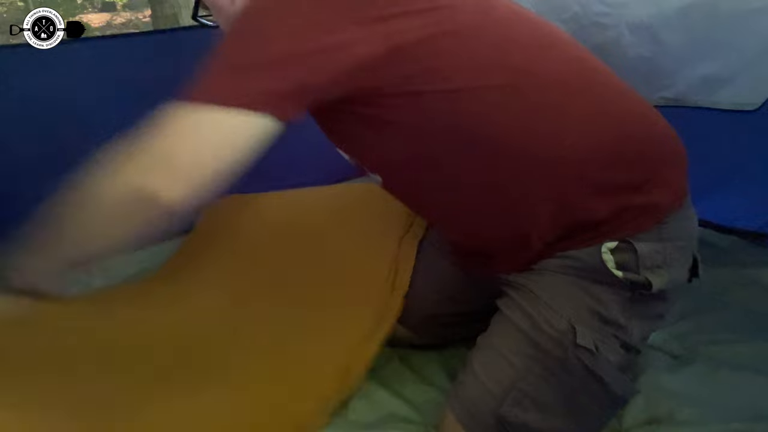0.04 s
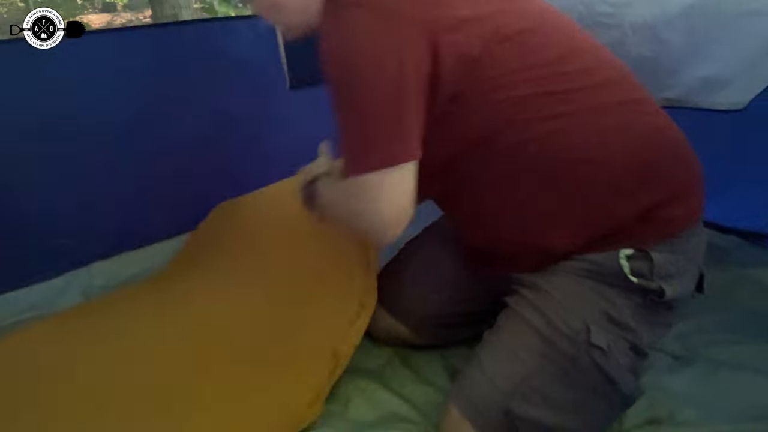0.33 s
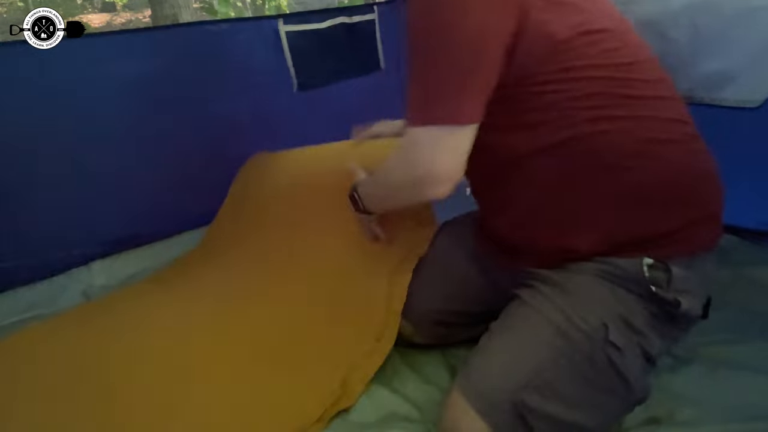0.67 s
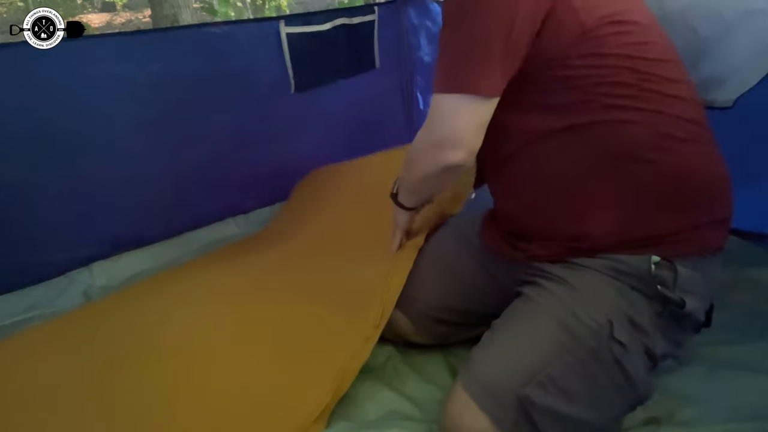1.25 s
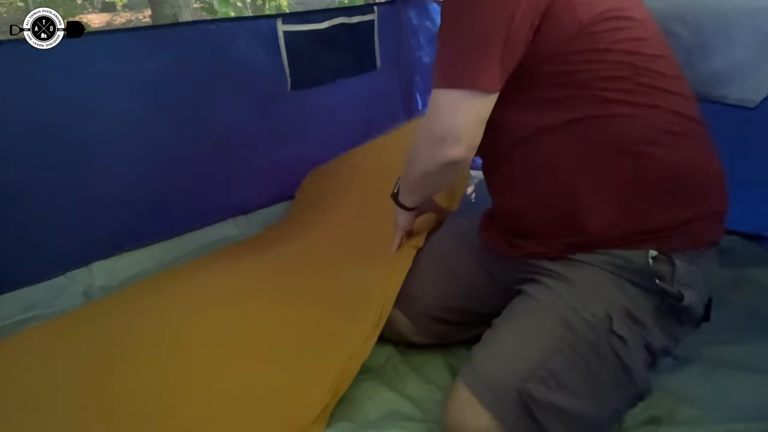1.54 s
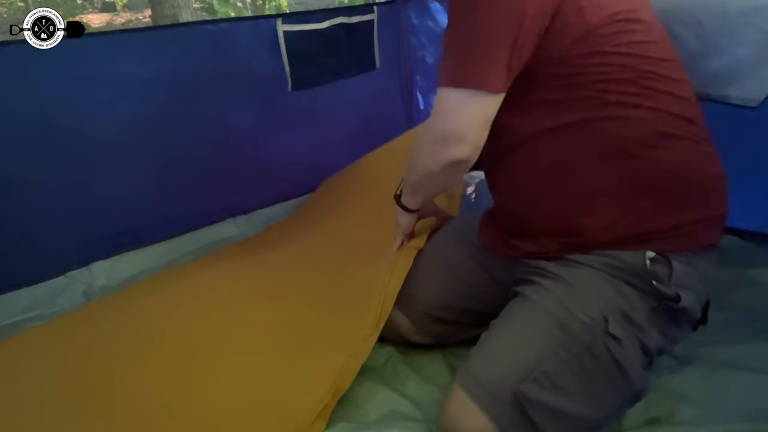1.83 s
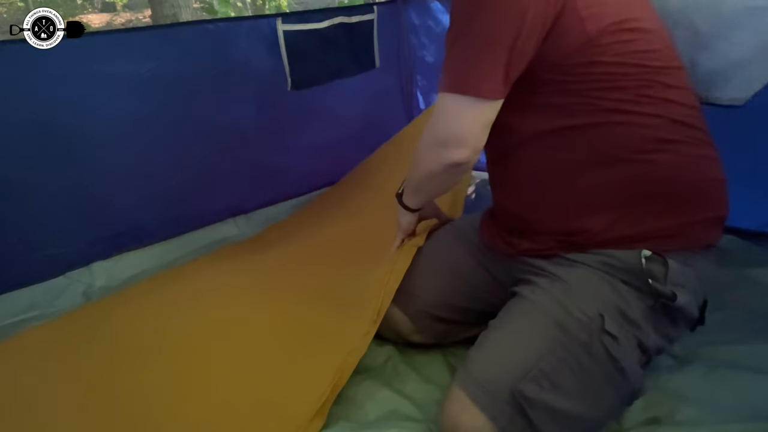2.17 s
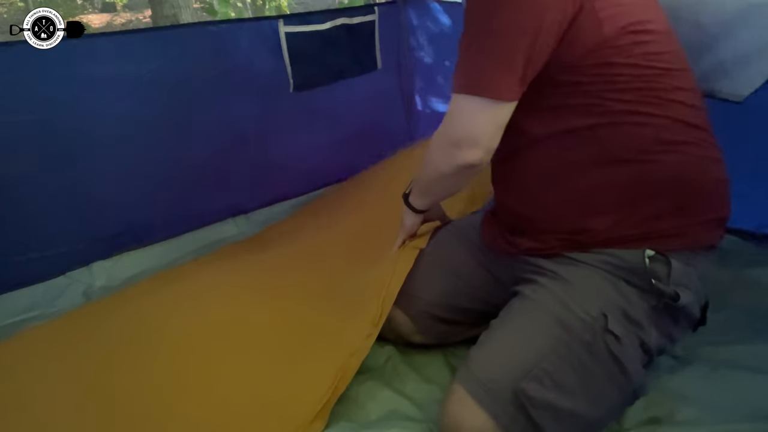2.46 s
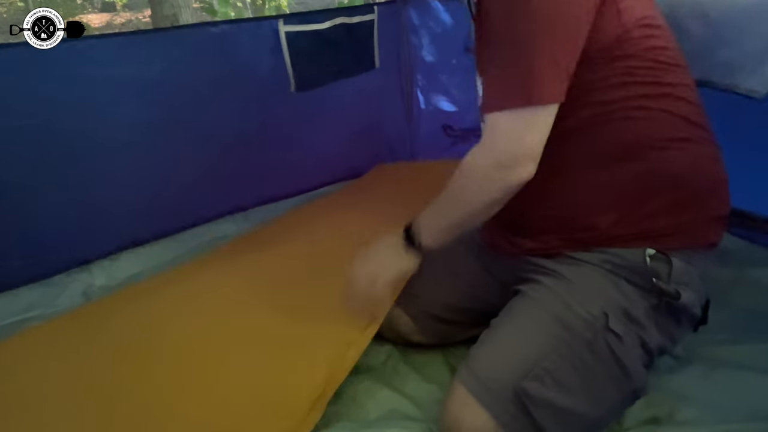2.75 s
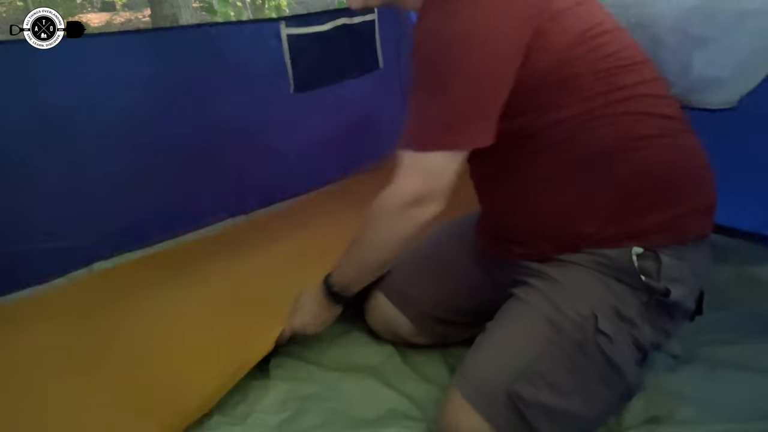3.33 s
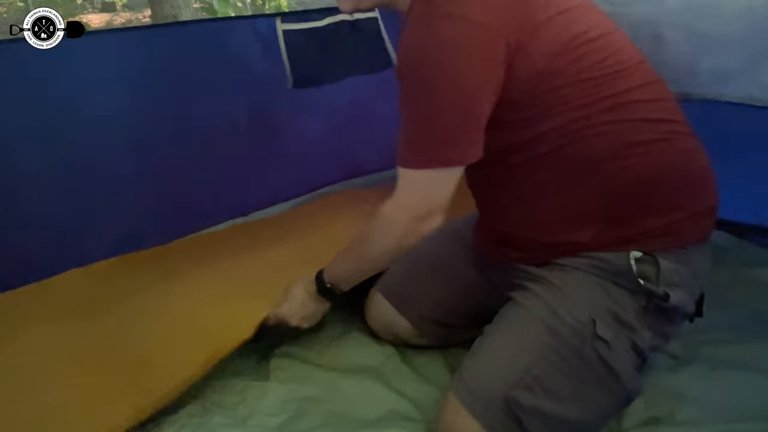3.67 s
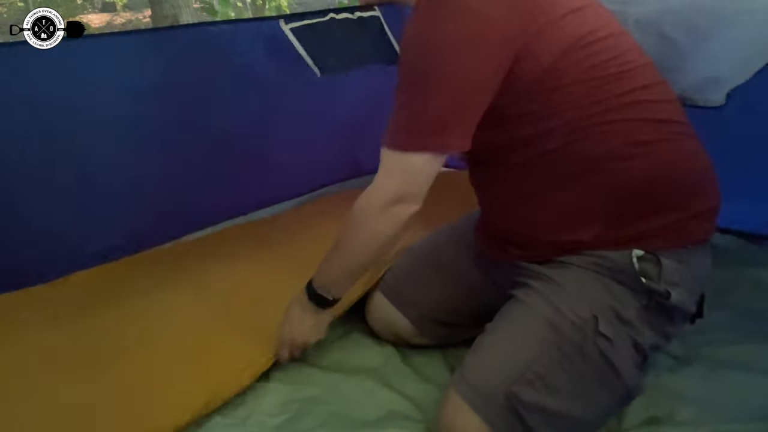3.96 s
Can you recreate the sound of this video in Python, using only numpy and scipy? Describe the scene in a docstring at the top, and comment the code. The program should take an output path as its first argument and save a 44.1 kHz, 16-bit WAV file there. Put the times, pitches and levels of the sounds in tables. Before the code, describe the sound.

Nylon rubbing and crinkling as an inflated camping mattress is shifted by hand, with soft thuds.

```python
"""Inside a tent, someone kneeling shifts an inflated camping mattress and slides a hand along its edge.
Nylon rubs in strokes of tiny slips, crumples in bursts of creases and zips as its ribbed weave slides.
The taut skin pops as it buckles and judders under the hand; the air-filled body thuds on the ground sheet.
The thin walls return a little of it all, over a quiet outdoor bed."""
import sys
import numpy as np
from scipy import signal
from scipy.fft import rfft, irfft
from scipy.io import wavfile

SR = 44100
rng = np.random.default_rng(int(sys.argv[2]) if len(sys.argv) > 2 else 0)


def wav_record(signal):
    """Record a signal, one row per channel, as 16-bit PCM in the file named by sys.argv[1]."""
    frames = np.transpose(np.atleast_2d(signal))
    bounded = np.clip(frames, -1, 1)
    # unit amplitude maps onto the largest positive 16-bit level
    quanta = np.round(bounded * 32767).astype(np.int16)
    wavfile.write(sys.argv[1], SR, quanta)


N = 176400
T = np.arange(N) / SR

# tone of the outdoor bed, in the centre and at the sides (frequency [Hz], relative level [dB])
OUTDOOR_EQ = [(15, -20), (28, 2.5), (60, 2), (130, 3), (200, -3.5), (670, -6.5), (1200, -10), (2070, -15.5),
              (4040, -18.5), (6370, -25), (9000, -23.5), (15000, -27)]
OUTDOOR_SIDE_EQ = [(20, -5), (70, 5.5), (150, -1), (400, -0.5), (2000, -43), (15000, -38)]
# stereo width from scattered sound (frequency [Hz], side relative to mid [dB])
WIDTH_EQ = [(30, -12), (70, -19), (140, -15), (300, -37), (1000, -51), (4000, -38.5), (8000, -32),
            (15000, -67)]
# the mattress bumps the ground sheet (start [s], level [dB], decay [s])
THUDS = [(0.023, -37.5, 0.061), (.09, -35.5, 0.066), (0.359, -45, 0.033), (.478, -42, 0.023),
         (0.514, -47.5, 0.074), (0.619, -52, 0.17), (0.849, -57, 0.034), (0.956, -48, 0.034),
         (2.759, -54, 0.11), (3.082, -53, .15), (3.482, -52, 0.084)]
# tone of a thud (frequency [Hz], relative level [dB])
THUD_EQ = [(20, -5), (45, -7), (80, -4), (140, -2), (200, -10), (400, -48), (1500, -72)]
# stretches where the hand judders (middle [s], half length [s], level [dB])
JUDDER_SPANS = [(3.175, 0.12, -46), (3.9, 0.14, -51.5)]
# the weave zips against itself (start [s], length [s], start pitch [Hz], end pitch [Hz], level [dB])
ZIPS = [(0.923, 0.031, 2000, 2680, -54.5), (.945, .055, 4000, 3290, -58), (1.874, 0.059, 3600, 9240, -57.5),
        (1.894, 0.022, 4450, 3700, -53.5), (1.909, 0.032, 6200, 3170, -55), (1.911, 0.02, 3300, 2100, -58),
        (1.927, 0.062, 3800, 3950, -65), (3.013, 0.042, 4700, 5700, -55), (3.037, 0.054, 4000, 2590, -49.5),
        (3.054, .055, 5800, 4370, -49.5), (3.112, .06, 5500, 4400, -48)]
# the taut skin buckles (start [s], level [dB], pitch [Hz], decay [s])
BUCKLES = [(.8572, -22.5, 730, 0.0031), (0.8574, -18, 346, 0.0051), (0.864, -24.5, 240, 0.0066),
           (.901, -33, 300, 0.0032), (2.8014, -25, 660, 0.00072), (2.845, -30.5, 494, 0.00096),
           (2.872, -35.5, 400, 0.0014), (3.3991, -28, 200, 0.004)]
# crumples and lone creases (start [s], rise [s], hold [s], decay [s], level [dB], bass [dB], treble [dB])
CREASE_BURSTS = [(0.086, .0004, 0.00066, 0.0077, -27, -3, 11), (0.09, 0.011, 0.024, 0.014, -27, 1.5, 7),
                 (0.169, 0.0059, .002, 0.0049, -38, 2, 4), (0.279, 0.003, 0.0049, 0.0079, -40, -3, -5),
                 (.307, 0.0008, 0.01, 0.004, -40.5, -9, 3), (.3402, 0.00043, 0.0016, 0.0013, -42, 0, 11),
                 (.3635, 0.0012, 0.005, 0.0037, -44.5, 13, -10), (.588, .002, .002, 0.0028, -53, -8, 6),
                 (0.67, 0.0041, .003, 0.0056, -46.5, 31, -12), (.729, 0.0026, 0.0053, 0.0019, -38, -11, 11),
                 (0.8348, .001, 0.0037, 0.017, -40, 21, 3), (0.849, .002, .003, 0.0023, -43, -1, 2),
                 (.857, 0.00034, 0.0055, 0.011, -33.5, 12.5, 1.5),
                 (0.899, 0.0028, 0.0082, 0.0028, -43, 21, -19), (1.055, 0.0023, 0.0024, .004, -50, -9, -20),
                 (1.204, 0.0013, 0.0018, .004, -47, 0, 20), (1.425, .001, 0.0027, .004, -47.5, 9, -24),
                 (1.67, 0.0018, 0.0061, 0.003, -49.5, 4, -4), (1.678, 0.009, 0.007, 0.011, -40, 3.5, 5),
                 (2.088, 0.0016, 0.0024, 0.0035, -49.5, 10, -34),
                 (2.099, .002, 0.0019, .003, -46.5, 13, -18), (2.133, 0.00073, 0.0014, 0.0033, -45, -2, 12),
                 (2.173, 0.0028, 0.0018, 0.0025, -46.5, -5, -8),
                 (2.333, .002, 0.0016, 0.0036, -48, -11, -22), (2.437, 0.0029, 0.0022, 0.0065, -50, 0, 5),
                 (2.4875, 0.00059, .001, .002, -45, -24, -15),
                 (2.602, 0.0034, 0.0048, 0.0036, -46.5, 17, -8),
                 (2.762, 0.0032, 0.0012, 0.0035, -46, -11, -3),
                 (2.774, 0.0008, 0.00092, .003, -46.5, -16, 0),
                 (2.801, 0.0012, 0.0011, 0.0018, -39, -3, -20), (3.196, .004, .01, .006, -49, -10, 16),
                 (3.316, 0.0016, .002, 0.0052, -38, -11, 22), (3.326, 0.0041, 0.019, .008, -44.5, -4, 5),
                 (3.399, 0.0013, 0.014, 0.012, -34, -3, 4), (3.632, 0.0011, .003, .003, -48, -15, 3),
                 (3.91, .003, .003, .005, -41.5, 12, 6), (3.934, 0.0068, 0.0057, 0.005, -31.5, -3, -4)]
# tone of a snapping crease (frequency [Hz], relative level [dB])
CREASE_EQ = [(35, -33), (70, -16), (250, -3), (450, 3), (750, 1), (1450, -4.5), (2200, -4.5), (3600, -7.5),
             (5000, -10.5), (6200, -17), (8500, -18), (11000, -22), (15000, -31)]
# rubbing strokes (peak time [s], rise [s], fall [s], skin drumming [dB], rasp [dB], hiss [dB])
RUB_STROKES = [(.025, .1, 0.077, -42.5, -44, -63), (.16, 0.12, 0.19, -51.5, -49, -55.5),
               (0.559, 0.18, 0.098, -59.5, -54, -55.5), (.64, 0.072, 0.14, -61, -58, -56),
               (.752, 0.019, 0.035, -52.5, -58, -50.5), (.88, 0.032, 0.088, -50, -52.5, -55),
               (0.964, 0.017, 0.066, -52, -57.5, -63), (1.12, 0.08, 0.087, -81, -67.5, -62.5),
               (1.21, 0.057, 0.12, -56.5, -58.5, -60.5), (1.53, 0.12, 0.059, -65.5, -67.5, -62.5),
               (1.745, .04, .03, -58, -58, -60.5), (1.925, 0.09, 0.077, -70, -69, -60),
               (2.2, 0.067, 0.024, -63, -63.5, -63), (2.46, 0.12, 0.13, -61, -65.5, -68.5),
               (2.56, 0.039, 0.033, -60, -62, -54), (2.635, 0.054, 0.059, -53.5, -59.5, -61),
               (2.775, 0.032, 0.027, -63, -72, -60.5), (2.961, 0.054, 0.13, -57, -56.5, -59),
               (3.13, 0.13, 0.3, -48, -46, -50), (3.22, 0.086, 0.11, -49.5, -47.5, -43.5),
               (3.34, 0.05, 0.085, -45.5, -46, -44.5), (3.448, 0.095, 0.046, -49, -49.5, -67),
               (3.539, 0.085, 0.07, -60, -59.5, -65), (3.66, 0.063, 0.09, -54, -50, -58.5),
               (3.78, 0.09, 0.055, -58.5, -48.5, -52), (3.85, 0.089, 0.14, -53, -51, -57),
               (3.99, .07, .08, -49, -49, -56.5)]
# tone of the three layers of a stroke (frequency [Hz], relative level [dB])
SKIN_EQ = [(60, -13), (130, -6.5), (200, -2), (380, -1), (650, -1.5), (900, -4.5), (1500, -8),
           (2500, -19.5), (6000, -50)]
RASP_EQ = [(300, -32), (1200, -2), (2000, -1), (3000, 0), (4000, -1), (5000, -2.5), (6000, -10),
           (9000, -12), (15000, -27)]
HISS_EQ = [(1500, -24), (4500, -4), (6500, -4), (8500, -1), (11000, -1), (13000, -2), (15500, -7.5)]

BASS_SHELF_HZ, TREBLE_SHELF_HZ = 520, 3500
OUTDOOR_DB, OUTDOOR_SIDE_DB = -56, -79
ECHO_S, ECHO_DB, TAIL_DECAY_S, TAIL_DB = .0115, -21, .026, -19
JUDDER_PER_S, JUDDER_SCATTER, SKIN_HZ, SKIN_RING_S = 48, .25, 366, .0035
ZIP_JITTER, ZIP_FLUTTER_DB, ZIP_WOBBLES_PER_S = .09, 4, 2500
GRIP_DB, TICK_VS_RASP_DB = 1.5, -11.5


def undb(db):
    return 10 ** (np.asarray(db) / 20)


def unit_rms(x):
    return x / np.sqrt(np.mean(x ** 2))


def convolve(x, impulse):
    return signal.fftconvolve(x, impulse)[:len(x)]


def eq(x, curve, bass_db=0, treble_db=0):
    """Colour x with an EQ curve and two shelves, as one minimum-phase filter of unit energy."""
    size = 4096
    f = np.maximum(np.fft.rfftfreq(size, 1 / SR), 1)
    hz, db = np.array(curve, float).T
    shelves_db = bass_db / (1 + (f / BASS_SHELF_HZ) ** 2) + treble_db / (1 + (TREBLE_SHELF_HZ / f) ** 2)
    gain = undb(np.interp(np.log(f), np.log(hz), db) + shelves_db)
    cepstrum = irfft(np.log(gain))
    cepstrum[1:size // 2] *= 2
    cepstrum[size // 2 + 1:] = 0
    impulse = irfft(np.exp(rfft(cepstrum)))
    return convolve(x, impulse / np.linalg.norm(impulse))


def clicks(per_s, spread_db, samples=N):
    """Random tiny clicks, many weak and a few strong; rms 1."""
    chance, strength, sign = rng.random((samples, 3)).T
    size = undb(-spread_db * np.log(np.maximum(strength, .01)))
    return unit_rms((chance < per_s / SR) * size * np.sign(sign - .5))


def drift(per_s):
    """Smooth random modulation; rms 1."""
    return unit_rms(np.interp(T * per_s, np.arange(N), rng.standard_normal(N)))


def add(out, start, x):
    """Mix x in at a start time in seconds."""
    i = int(start * SR)
    out[i:i + len(x)] += x[:max(N - i, 0)]


def outdoors():
    """A quiet bed of rumble and air, its level barely wavering."""
    return undb(OUTDOOR_DB + .6 * drift(per_s=7.28)) * eq(rng.standard_normal(N), OUTDOOR_EQ)


def tent(x):
    """The thin walls add one echo and a very short diffuse tail."""
    t = T[:SR // 6]
    tail = rng.standard_normal(len(t)) * np.exp(-t / TAIL_DECAY_S) * (t > ECHO_S / 2)
    reflections = undb(TAIL_DB) * tail / np.linalg.norm(tail)
    reflections[int(ECHO_S * SR)] += undb(ECHO_DB)
    return x + convolve(x, reflections)


def stereo_side(mattress):
    """Only a little scattered sound and outdoor rumble differ between the ears."""
    hz, db = np.array(WIDTH_EQ, float).T
    width = undb(np.interp(np.log(np.fft.rfftfreq(N, 1 / SR) + 1), np.log(hz), db))
    scattered = irfft(1j * width * rfft(mattress), N)  # a quarter cycle out of phase
    return scattered + undb(OUTDOOR_SIDE_DB) * eq(rng.standard_normal(N), OUTDOOR_SIDE_EQ)


def body_thuds(rise_s=.0037):
    """The air-filled body lands on the ground sheet with soft, low thuds."""
    out, t = np.zeros(N), T[:SR // 2]
    for start, db, decay in THUDS:
        envelope = np.minimum(t / rise_s, 1) * np.exp(-np.maximum(t - 2 * rise_s, 0) / decay)
        thud = eq(envelope * rng.standard_normal(len(t)), THUD_EQ)
        add(out, start, undb(db) * thud * np.linalg.norm(envelope) / np.linalg.norm(thud))
    return out


def hand_judder(jerks=260):
    """The dragging hand sticks and slips; each uneven jerk rings the taut skin."""
    out, t = np.zeros(N), T[:SR // 16]
    gap, strength = rng.standard_normal((jerks, 2)).T
    starts = np.cumsum(np.exp(JUDDER_SCATTER * gap)) / JUDDER_PER_S
    skin_ring = np.sin(2 * np.pi * SKIN_HZ * t) * np.exp(-t / SKIN_RING_S)
    for start, db in zip(starts, 2 * strength):
        add(out, start, undb(db) * skin_ring)
    envelope = sum(undb(db) * np.exp(-((T - middle) / half) ** 4) for middle, half, db in JUDDER_SPANS)
    return unit_rms(out) * envelope


def weave_zips():
    """Ribbed weave slides over itself in short scratchy whistles, pitch gliding with the speed."""
    out = np.zeros(N)
    for start, length, from_hz, to_hz, db in ZIPS:
        t = T[:int(length * SR)]
        knots = rng.standard_normal((2, N // 100))
        jitter, flutter = (np.interp(t * ZIP_WOBBLES_PER_S, np.arange(len(k)), k) for k in knots)
        hz = (from_hz + (to_hz - from_hz) * t / length) * (1 + ZIP_JITTER * jitter)
        tone = unit_rms(np.sin(2 * np.pi * np.cumsum(hz) / SR) * undb(ZIP_FLUTTER_DB * flutter))
        add(out, start, undb(db) * np.sin(np.pi * t / length) * tone)
    return out


def skin_pops(cutoff_hz=2220):
    """The skin buckles and swings for a few heavily damped cycles; soft fabric dulls the attack."""
    out, t = np.zeros(N), T[:SR // 8]
    for start, db, hz, decay in BUCKLES:
        add(out, start, -undb(db) * np.sin(2 * np.pi * hz * t) * np.exp(-t / decay))
    return signal.lfilter(*signal.butter(2, cutoff_hz, fs=SR), out)


def nylon_crumples():
    """Creases snap in dense bursts that rise, hold and die quickly."""
    out, t = np.zeros(N), T[:SR // 4]
    for start, rise, hold, decay, db, bass_db, treble_db in CREASE_BURSTS:
        envelope = np.minimum(t / rise, 1) * np.exp(-np.maximum(t - rise - hold, 0) / decay)
        snaps = clicks(per_s=5000, spread_db=1.5, samples=len(t))
        burst = eq(envelope * snaps, CREASE_EQ, bass_db, treble_db)
        add(out, start, undb(db) * burst * np.linalg.norm(envelope) / np.linalg.norm(burst))
    return out


def nylon_rubbing():
    """Strokes swell and fade: slips drum the skin, rasp and hiss as the grip wavers; stray creases tick."""
    power = np.zeros((3, N))
    for peak, rise, fall, *layer_db in RUB_STROKES:
        swell = np.exp(-((T - peak) / np.where(T < peak, rise, fall)) ** 2)
        power += np.outer(undb(layer_db), swell) ** 2
    skin_gain, rasp_gain, hiss_gain = np.sqrt(power)
    grip = undb(GRIP_DB * drift(per_s=86))
    drumming = eq(skin_gain * grip * clicks(per_s=1700, spread_db=.5), SKIN_EQ)
    rasp = eq(rasp_gain * grip * clicks(per_s=9000, spread_db=3.5), RASP_EQ)
    hiss = eq(hiss_gain * np.sqrt(grip) * rng.standard_normal(N), HISS_EQ)
    ticks = eq(rasp_gain * undb(TICK_VS_RASP_DB) * clicks(per_s=55, spread_db=4), CREASE_EQ)
    return drumming + rasp + hiss + ticks


def scene():
    """The mattress up close in the tent, over the outdoor bed; nearly mono."""
    bed = outdoors()
    direct = nylon_rubbing() + nylon_crumples() + skin_pops() + body_thuds() + weave_zips() + hand_judder()
    mattress = tent(direct)
    side = stereo_side(mattress)
    return bed + mattress + np.array([side, -side])


def record(dry):
    """A steep high cut takes off the very top."""
    cutoff_hz = 15750
    return signal.sosfilt(signal.ellip(10, .2, 80, cutoff_hz, fs=SR, output="sos"), dry)


dry = scene()
out = record(dry)
wav_record(out)
```